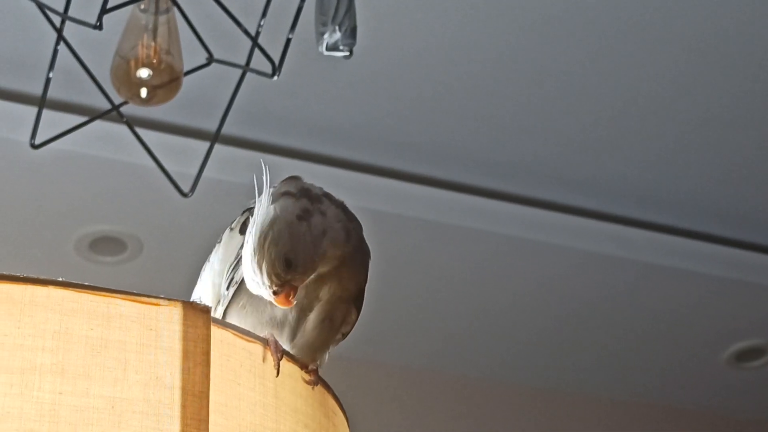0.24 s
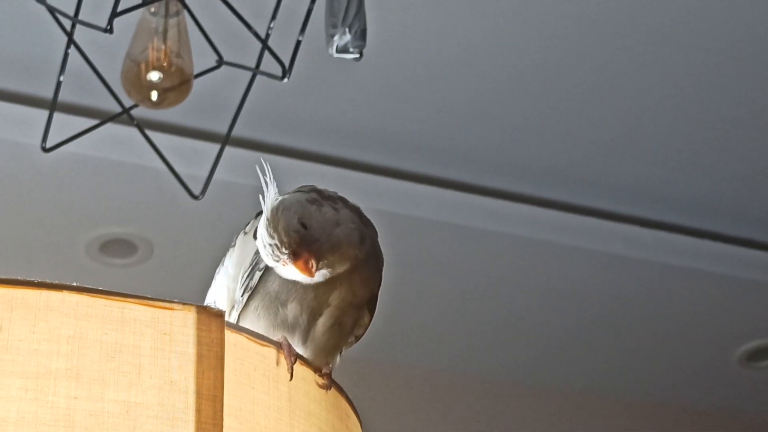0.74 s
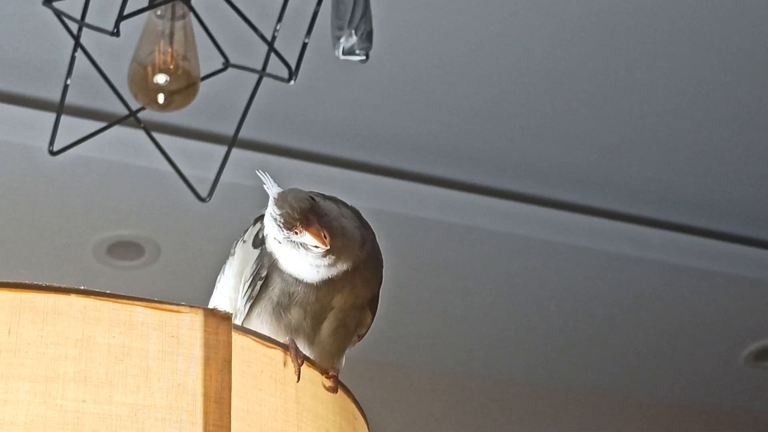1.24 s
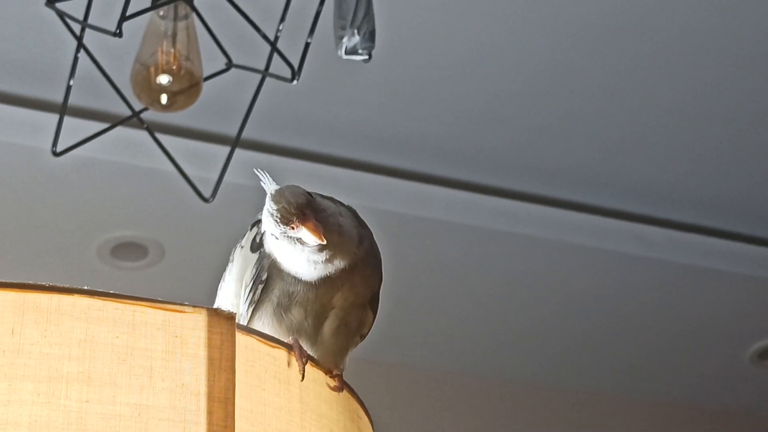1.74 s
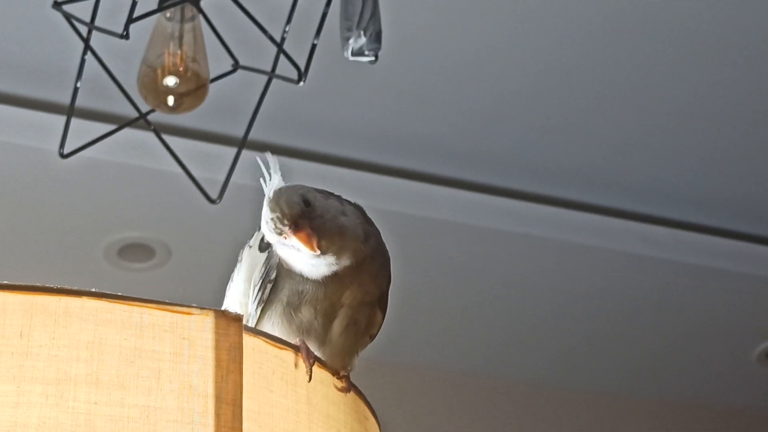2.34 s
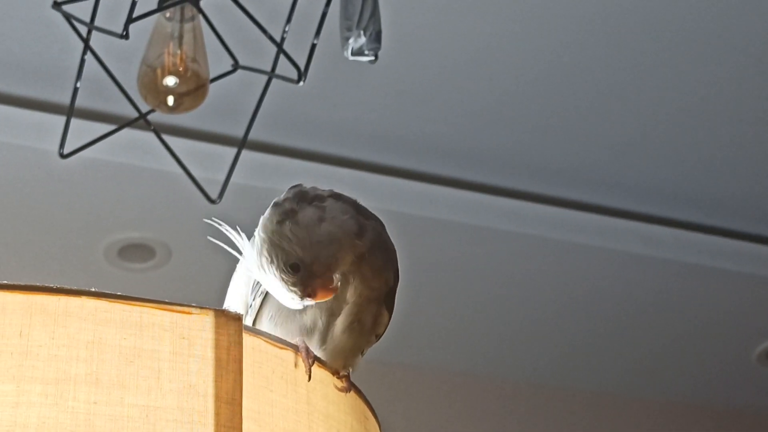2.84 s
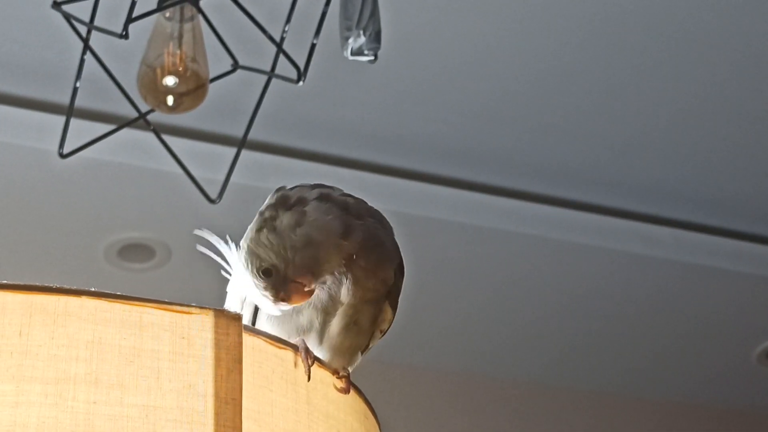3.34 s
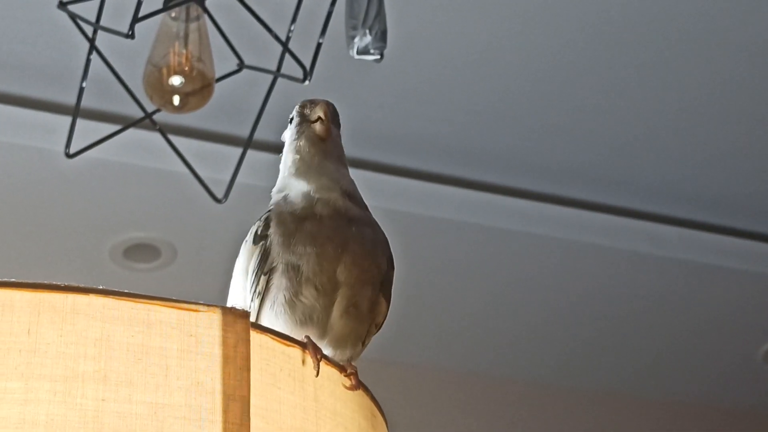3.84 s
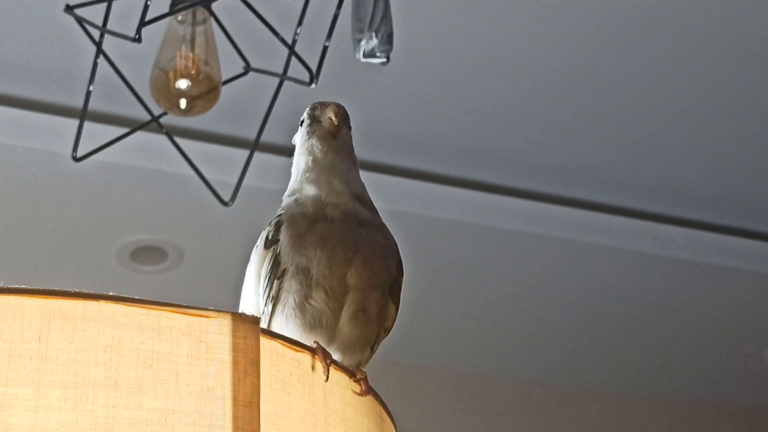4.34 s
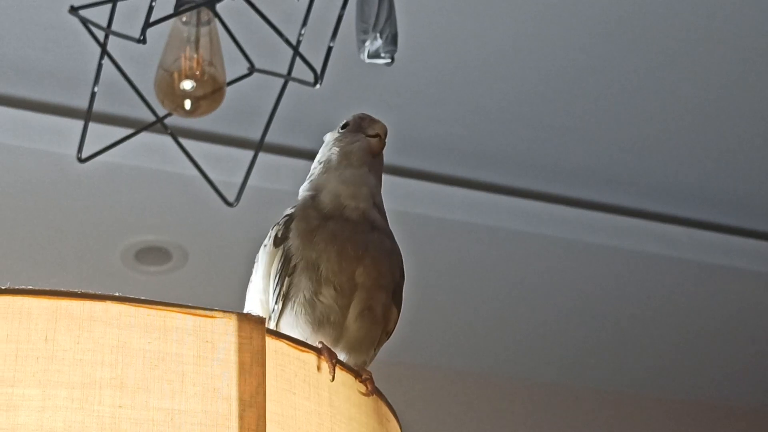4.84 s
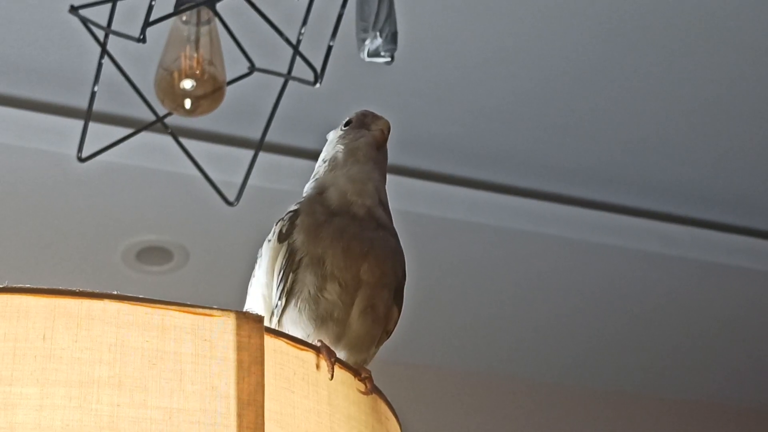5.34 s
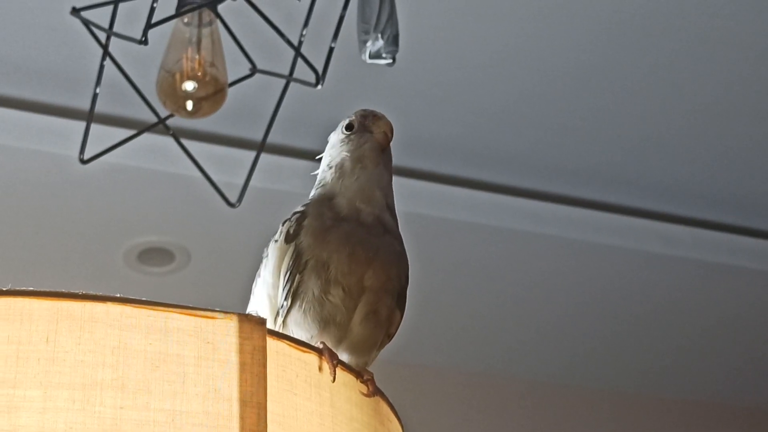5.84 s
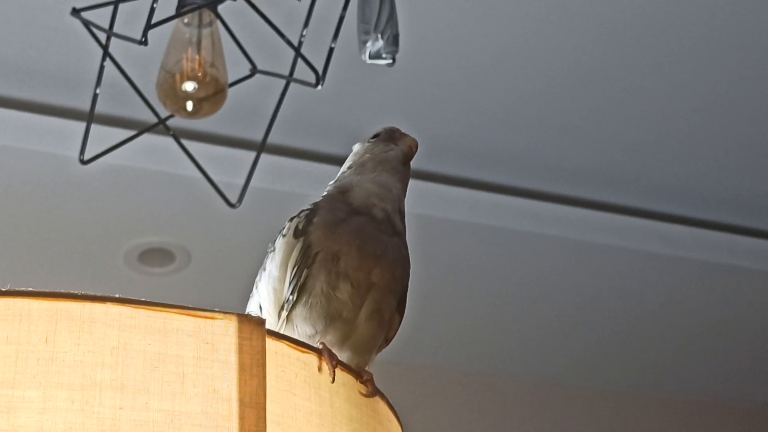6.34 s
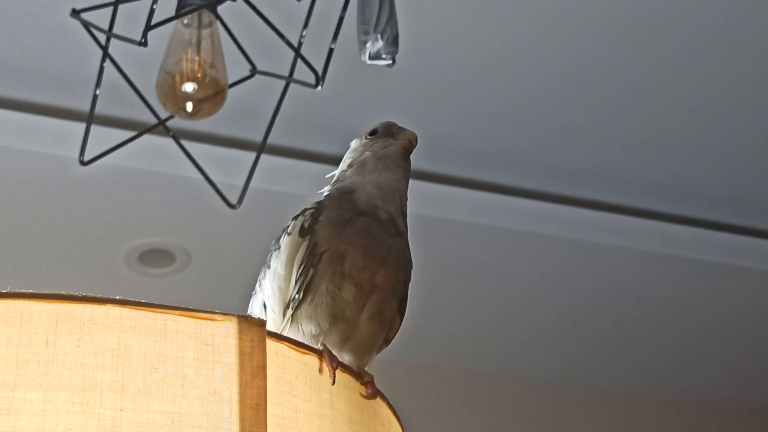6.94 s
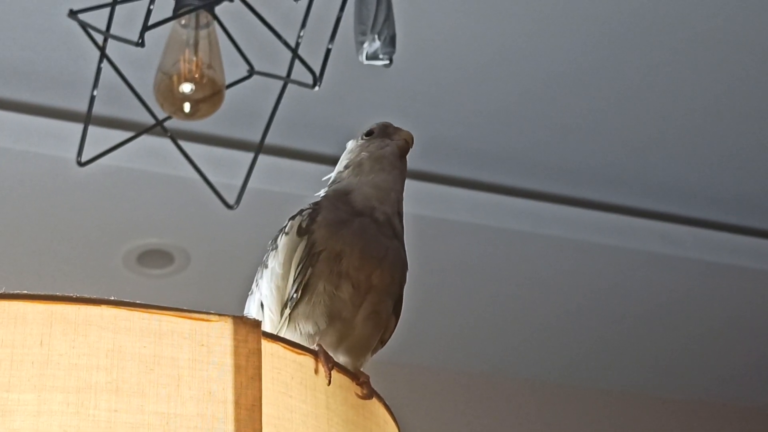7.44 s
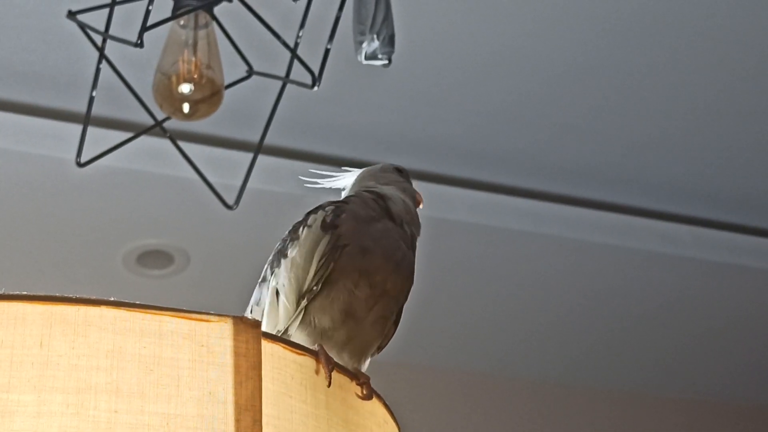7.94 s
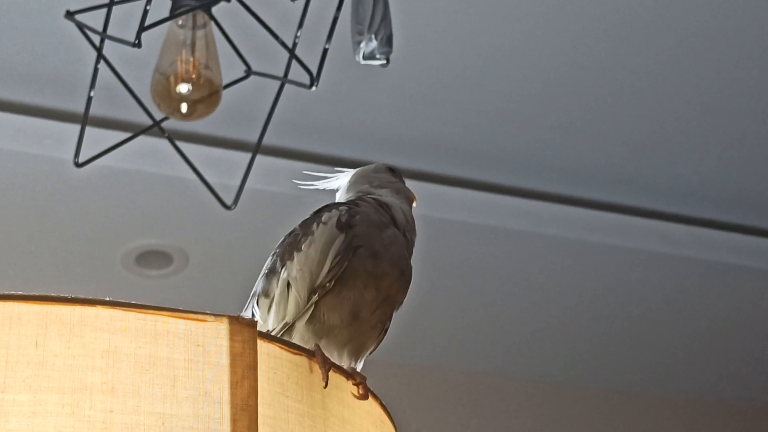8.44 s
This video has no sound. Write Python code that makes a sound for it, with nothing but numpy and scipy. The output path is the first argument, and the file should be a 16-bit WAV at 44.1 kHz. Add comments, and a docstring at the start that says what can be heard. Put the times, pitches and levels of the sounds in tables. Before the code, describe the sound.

Quick, squeaky chirps and whistles from a pet cockatiel alternate high and low in a quiet living room.

```python
"""Quick whistled notes from a pet cockatiel, a few steps from a phone microphone in a living room.
Its syrinx sings a nearly pure tone; most notes drop fast in pitch as the throat closes, and the
room smears each into a short tail. Low throat rasps, beak clicks and two feather rustles fall
among them. Underneath lie mains hum and the quiet wash of the house, its rumble slowly swelling."""
import sys
import numpy as np
from scipy import signal
from scipy.fft import rfft, irfft, next_fast_len
from scipy.io import wavfile
from scipy.ndimage import uniform_filter1d

SR = 44100
rng = np.random.default_rng(int(sys.argv[2]) if len(sys.argv) > 2 else 0)


def generate_wav(sig):
    """Save sig (samples, or channels by samples) to the path in sys.argv[1] as 16-bit PCM at SR."""
    pcm = np.round(np.clip(np.atleast_2d(sig).T, -1, 1) * 32767).astype(np.int16)
    wavfile.write(sys.argv[1], SR, pcm)


N = 383669
LEAD = SR // 5  # samples sung before the start


def gain_of(db):
    """Decibels to a factor."""
    return 10 ** (np.asarray(db) / 20)


def unit_rms(x):
    """Scales to rms 1."""
    return x / np.sqrt(np.mean(x ** 2) + 1e-20)


def value_at(points, hz):
    """Reads a curve on a log-frequency axis."""
    f, value = np.transpose(points)
    return np.interp(np.log(hz + 1), np.log(f + 1), value)


def coloured(x, points):
    """Filters x by a curve of (Hz, dB) points."""
    size = next_fast_len(len(x))
    return irfft(rfft(x, size) * gain_of(value_at(points, np.fft.rfftfreq(size, 1 / SR))), size)[:len(x)]


def drift(count, size):
    """A random wander of rms 1, smoothed over size samples."""
    return unit_rms(uniform_filter1d(uniform_filter1d(rng.standard_normal(count), size), size))


def add(mix, s, sound):
    """Mixes a sound in at s seconds."""
    part = mix[LEAD + round(s * SR):][:len(sound)]
    part += sound[:len(part)]


def syrinx(rows, sparkle_db, halves_db):
    """Vibrating membranes sing a nearly pure tone with overtones and a little air: (start s, sound)."""
    # Above the octave. Each row: multiple of the pitch, level in dB.
    overtones = [(3, 13), (4, 6), (5, 3.5), (6, -2), (7, -2), (8, -2.5), (9, -7), (10, -5.5), (11, -4)]
    # The windpipe colours the overtones. Each row: frequency in Hz, gain in dB.
    windpipe = [(4500, 0), (5200, -15), (5900, -13), (6500, -1), (7700, 4), (9000, 0)]
    # Every other cycle differs in low notes. Each row: multiple of the pitch, relative level in dB.
    half_lines = [(.5, -33), (1.5, -30.5), (2.5, -42), (3.5, -45)]
    s, *columns = np.transpose(rows)
    t = np.arange(s[0], s[-1], 1 / SR)
    hz, fundamental_db, octave_db, upper_db = (
        uniform_filter1d(np.interp(t, s, c), size=90, mode="nearest") for c in columns)
    glide = abs(np.gradient(np.log(hz))) * SR  # per second
    sparkle_db = sparkle_db - np.minimum(.6 * glide, 24)  # slack membranes lose their top in a fast drop
    slack = np.clip(glide / 25, 0, 1)  # a sliding pitch makes the cycles uneven
    sharp = .25 * np.exp(-(t - t[0]) / .0007)  # the membranes start sharp and settle
    sung_hz = hz * (1 + sharp + .0013 * drift(len(t), size=60))
    phase = 2 * np.pi * (np.cumsum(sung_hz) / SR + rng.random())
    husk = 1 + (.02 + .15 * slack) * drift(len(t), size=25)  # uneven cycles spread a haze round the tone
    tone = gain_of(fundamental_db + 1.2 * drift(len(t), size=200)) * husk * np.sin(phase)
    tone += gain_of(octave_db) * np.cos(2 * phase)

    def partial(k, db):
        return gain_of(db) * (k * hz < SR / 2.2) * np.sin(k * phase + k * k)

    for k, db in overtones:
        top = np.clip((k * hz - 9000) / 2000, 0, 1)
        flicker_db = 4.5 * drift(len(t), size=250)
        tone += partial(k, upper_db + db + flicker_db + value_at(windpipe, k * hz) + top * sparkle_db)
    low_voice = np.clip((1800 - hz) / 200, 0, 1) * gain_of(halves_db + 3 * drift(len(t), size=300))
    for k, db in half_lines:
        tone += low_voice * gain_of(fundamental_db + db) * np.sin(k * phase)
    for k in np.arange(7.5, 11):  # half lines among the top overtones
        tone += low_voice * partial(k, upper_db + sparkle_db - 4.5)
    air = gain_of(upper_db - 17) * rng.standard_normal(len(t))
    edges = np.clip(np.minimum((t - t[0]) / .0031, (t[-1] - t) / .002), 0, 1)
    return s[0], np.sqrt(2) * gain_of(-1) * edges * (tone + air)


def short_note(shape, start, settle, swell, turn, onset_hz, settle_hz, swell_hz, turn_hz,
               settle_db, swell_db, octave_db, upper_db, sparkle_db, fade_db=0, halves_db=-8):
    """A note passes onset, settle, swell and turn, then drops as the throat closes."""
    stages, drop = shape
    turn_db = swell_db + fade_db
    path = [(0, onset_hz, settle_db), (settle, settle_hz, settle_db),
            (swell, swell_hz, swell_db), (turn, turn_hz, turn_db)]
    rows = [(start + s, hz, *np.add((db, octave_db, upper_db), offsets))
            for (s, hz, db), offsets in zip(path, stages)]
    rows += [(start + turn + later, share * turn_hz, *np.add((turn_db, octave_db, upper_db), offsets))
             for later, share, *offsets in drop]
    return syrinx(rows, sparkle_db, halves_db)


def song():
    """Five kinds of short note, and two longer whistles that leap up and do not drop."""
    # Each row: start in seconds; settle, swell and turn in seconds after it; four stage pitches in Hz;
    # then in dB the fundamental at settle and swell, octave, higher overtones, sparkle (full above
    # 11 kHz) and, where given, fade from swell to turn and half lines.
    high = [(-.16, .02, .05, 0.057, 2383, 2080, 2149, 2262, -28, -26, -21, -55, 2.5, -7.5),
            (.404, 0.022, 0.0566, 0.0678, 2528, 2015, 2210, 2218, -33, -25, -22, -50.5, 0, -2.5),
            (.806, 0.019, .051, 0.0591, 2497, 2080, 2135, 2354, -34, -29, -21, -51, 5.5, 2.5),
            (1.212, 0.021, 0.0533, 0.06116, 2345, 2027, 2188, 2274, -37.5, -26, -19.5, -51, 2.5, -1),
            (3.381, .022, 0.0612, 0.0679, 2400, 2071, 2266, 2259, -32, -24, -18.5, -45.5, -5.5, -1.5),
            (3.796, .018, 0.0547, 0.073, 2522, 2041, 2296, 2402, -31.5, -24, -20.5, -50.5, 4, -5),
            (4.202, .045, .06, 0.0783, 2335, 2185, 2131, 2300, -30, -25.5, -19, -50, 7.5, -2.5),
            (5.242, .03, 0.064, 0.06784, 2150, 2095, 2171, 2248, -35, -22, -21.5, -54, -4, -6.5),
            (5.664, 0.02, 0.063, .069, 2367, 2056, 2182, 2340, -32.5, -24, -22, -55, -4, -6.5),
            (7.15, .022, 0.044, 0.06465, 2396, 2118, 2182, 2278, -28.5, -22, -17.5, -48.5, 0, -7.5),
            (7.566, 0.036, 0.0568, 0.0759, 2265, 2075, 2213, 2274, -29, -23.5, -18, -49, -3.5, -2.5),
            (8.014, 0.02, 0.0602, 0.0679, 2306, 2102, 2229, 2202, -31, -26, -19.5, -49, 3, -1.5)]
    low = [(.217, 0.0179, 0.0552, 0.0832, 1380, 1395, 1624, 1569, -37.5, -31.5, -64, -80.5, 10.5, -8, -4.5),
           (0.619, .028, 0.0441, 0.0696, 1334, 1404, 1515, 1531, -38, -34, -65, -80.5, 10.5, 1, 1),
           (1.03, 0.0275, 0.0544, 0.068, 1406, 1431, 1576, 1564, -36.5, -34.5, -62, -77, 11.5, -3.5, -2.5),
           (3.18, 0.0053, 0.01975, 0.0726, 1337, 1370, 1380, 1525, -40, -36, -59.5, -81, 10, -6, -6),
           (3.595, 0.0094, .06, 0.0966, 1392, 1337, 1651, 1651, -39, -32.5, -64.5, -76.5, 15, -0.5, -12),
           (4.012, 0.0129, 0.0563, 0.0764, 1535, 1346, 1645, 1600, -44, -31.5, -64, -78, 4, -1.56, -6.5),
           (5.03, 0.0253, 0.0461, .101, 1374, 1386, 1478, 1551, -43, -32, -64, -75.5, -0.2, -5.5, -5.5),
           (5.48, .013, 0.032, .074, 1430, 1429, 1480, 1653, -40.5, -33.5, -61, -76, 2.4, -3.5, -8),
           (6.957, 0.0297, 0.051, 0.0843, 1369, 1447, 1539, 1573, -41.5, -31, -58, -74.5, 6, -3, -6),
           (7.347, .022, 0.0985, 0.113, 1646, 1465, 1663, 1569, -38.5, -35.5, -67, -75.5, -4.5, -3, 2),
           (7.811, 0.0187, 0.0713, 0.0827, 1565, 1451, 1576, 1531, -39.5, -33.5, -63, -77.5, -2, -8, -0.12)]
    middle = [(2.336, 0.024, 0.0591, .072, 2224, 1965, 1998, 1881, -42, -33.5, -64, -64.5, 12.8),
              (2.821, 0.0178, 0.063, 0.0746, 2115, 2001, 2086, 2135, -39.5, -36, -61.5, -64.5, 7.3),
              (6.524, 0.017, .072, 0.0974, 1583, 1830, 1940, 1905, -44, -32, -50.5, -67.5, 9)]
    chips = [(.023, .011, .015, 0.0193, 2944, 2264, 1958, 1924, -38, -28.5, -22, -53.5, -10),
             (3.024, .004, .007, 0.0092, 2529, 2158, 1998, 1931, -39, -28, -22, -52.5, -3.5),
             (4.855, .009, 0.019, 0.02513, 2796, 2831, 2095, 1842, -28.5, -32, -25.5, -61.5, -7),
             (6.745, .001, .002, 0.0066, 1899, 1953, 1905, 1803, -34.5, -33.5, -24.5, -62.5, -3.5),
             (8.67, .013, .018, 0.0259, 2650, 2640, 2060, 1787, -32.5, -36.5, -41.5, -67, 7.5)]
    falls = [(1.422, 0.0294, 0.0512, 0.0547, 2539, 2217, 1841, 1390, -39, -40.5, -62.5, -69, 11, 7.5, -5.5),
             (4.446, 0.0249, 0.0403, 0.0578, 2640, 2135, 1834, 1794, -39.5, -40.5, -62, -74.5, 5, 5, 7),
             (5.882, .034, .055, .065, 2547, 2238, 1863, 1370, -33.5, -35.5, -57, -71, 6, 0, 7.5),
             (8.22, 0.031, 0.0543, 0.0634, 2740, 2196, 1957, 1379, -36, -34.5, -62.5, -69, -2, 0.5, -2.5)]
    # What each kind shares. Each of four stage rows: offsets in dB for fundamental, octave, overtones.
    # Each drop row: seconds after the turn, share of the turn pitch, the same three offsets.
    high_shape = ([(-4, -51.5, -32.5), (-0.5, -22, -16), (-2, -7, -9), (-1, -13.5, -7.5)],
                  [(.006, 0.962, -1.5, -8, -6.5), (.01, .89, -5.5, -2.5, -3.5),
                  (.0135, 0.7972, -6.5, -0.5, 3.5), (.016, 0.6787, -13, -12.5, -6.5),
                  (.019, 0.56, -27.5, -34, -19.5)])
    low_shape = ([(-1, 1, -5), (0.83, -5, -2.5), (0.68, 1, 2), (0, -0.5, -1)], [(.003, .92, -1.5, 1, -4),
                 (.006, .74, -16, -10.5, -10)])
    middle_shape = ([(-12.5, -19.5, -26), (-0.5, -7.5, -14.5), (2.5, 3.5, -1.5), (-2.5, -4.5, -8.5)],
                    [(.003, .91, -14, -20, -10), (.006, .57, -21.5, -20, -23.5), (.011, .51, -30, -5, -28)])
    chip_shape = ([(2.5, -41.5, -23), (-0.5, -27, -19.5), (-2, -13, -14.5), (-11.5, -0.5, -3)],
                  [(.004, .85, -8.5, -9, 2), (.009, .66, -25.5, -31, -21)])
    fall_shape = ([(-7, -19.5, -21), (0, 4, 1), (-1, -3.5, -1), (-6.5, -9.5, -7)],
                  [(.009, .9, -13, -7.5, -13.5)])
    # One list a whistle. Each row: time in seconds, pitch in Hz, fundamental, octave, overtones in dB.
    leaps = [
        [(4.621, 2377, -31, -73.5, -80.5), (4.658, 2121, -29.5, -44.5, -72), (4.7, 2189, -26, -31.5, -60.5),
         (4.725, 2362, -25, -41, -59.5), (4.743, 2652, -21.5, -62.5, -76), (4.757, 2653, -42.5, -57, -73),
         (4.775, 2545, -35.5, -61, -80)],
        [(8.425, 2602, -42.5, -73, -103.5), (8.446, 2293, -33.5, -54, -72), (8.467, 2179, -23, -47, -68.5),
         (8.515, 2297, -31.5, -42, -62), (8.519, 2698, -23, -58, -74.5), (8.545, 2856, -32, -67, -74),
         (8.566, 2912, -48.5, -68, -75.5)],
    ]
    mix = np.zeros(LEAD + N)
    for shape, notes in ((high_shape, high), (low_shape, low), (middle_shape, middle),
                         (chip_shape, chips), (fall_shape, falls)):
        for row in notes:
            add(mix, *short_note(shape, *row))
    for rows in leaps:
        add(mix, *syrinx(rows, sparkle_db=6, halves_db=-8))
    return mix


def living_room(x):
    """A few steps away: direct sound, wall echoes, then a dense tail whose top treble dies first."""
    # Each row: frequency in Hz, seconds for the tail to fall 60 dB.
    decay = [(700, 0.32), (1500, 0.324), (2500, 0.305), (4500, 0.2726), (8000, 0.33), (14000, .22)]
    # First echoes. Each row: delay in seconds, level in dB against the direct sound.
    walls = [(.008, -11.5), (.012, -13.5), (.017, -24.5), (.024, -16.5)]
    hz, t, spectrum = signal.stft(rng.standard_normal(SR), SR, nperseg=256)
    spectrum *= gain_of(-60 * t / value_at(decay, hz)[:, None])
    tail = signal.istft(spectrum, SR, nperseg=256)[1][:SR]
    tail *= np.clip(np.arange(SR) / SR / .041, 0, 1)  # builds up over the first echoes
    response = gain_of(-9) * tail / np.linalg.norm(tail)
    response[0] = 1
    for s, db in walls:
        response[round(s * SR)] += gain_of(db) * rng.choice([-1, 1])
    return signal.fftconvolve(x, response)[:len(x)]


def house():
    """Room tone: mains hum wavers a little over a wash of air and appliances."""
    # Each row: frequency in Hz, rms level in dB.
    mains = [(100, -75.5), (200, -70), (300, -82.5), (400, -94)]
    # Each row: frequency in Hz, relative noise density in dB.
    wash_spectrum = [(30, -31), (48, -24.5), (65, -3), (100, 0), (180, 0), (400, -8.5), (900, -13.5),
                     (2000, -23.5), (5000, -25), (8000, -21), (13000, -31), (16000, -29.5)]
    # The low rumble swells. Each row: time in seconds, gain in dB.
    rumble_swell = [(0, -1.5), (4.2, -0.5), (4.8, 0.5), (6.5, 1.5), (8, 4.5), (8.7, 5.5)]
    t = np.arange(N) / SR
    hum = np.zeros(N)
    for hz, db in mains:
        amplitude = np.sqrt(2) * gain_of(db + .54 * drift(N, size=3000))
        hum += amplitude * np.sin(2 * np.pi * (hz * t + rng.random()))
    wash = unit_rms(coloured(rng.standard_normal(N), wash_spectrum))
    rumble = coloured(wash, [(150, -4.5), (400, -35.5)])
    wash += rumble * (gain_of(np.interp(t, *np.transpose(rumble_swell))) - 1)
    return hum + gain_of(-66.5 + .5 * drift(N, size=9000)) * wash


def throat_rasps():
    """A few low, uneven cycles as the throat closes or opens."""
    # Each row: start in seconds, level in dB, centre pitch in Hz, length in seconds.
    rasps = [(1.461, -48.5, 774, 0.0395), (2.367, -61.5, 1008, 0.01), (2.411, -56.5, 1036, 0.013),
             (2.897, -48, 1090, 0.0055), (3.46, -43, 949.6, 0.014), (4.007, -53.5, 802.7, 0.041),
             (4.481, -51.5, 829.5, 0.0418), (4.756, -51, 1243, 0.00875), (8.536, -48, 1393, 0.0095),
             (5.036, -51, 882, 0.017), (5.939, -49.5, 749.7, 0.0136), (6.53, -56, 863, 0.0447),
             (7.349, -52, 946.5, 0.0145), (7.816, -59, 744, 0.04), (8.271, -49.5, 742, 0.0169)]
    mix = np.zeros(LEAD + N)
    for s, db, hz, length in rasps:
        count = round(length * SR)
        rough_hz = hz * (1 + .12 * drift(count, size=60))
        phase = 2 * np.pi * (np.cumsum(rough_hz) / SR + rng.random())
        add(mix, s, gain_of(db + 3 * drift(count, size=80)) * np.sin(phase) * np.hanning(count))
    return mix


def beak_clicks():
    """Small clicks of the beak, each a ring that dies at once."""
    # Each row: start in seconds, level in dB.
    clicks = [(1.553, -46), (2.3765, -49), (2.8509, -63), (4.551, -47.5), (5.2564, -44)]
    t = np.arange(100) / SR
    ring = np.sin(2 * np.pi * 3200 * t) * np.exp(-t / .00015)
    mix = np.zeros(LEAD + N)
    for s, db in clicks:
        add(mix, s, gain_of(db) * ring)
    return mix


def feather_rustles():
    """Grainy hiss of feathers sliding over each other."""
    # One list a rustle. Each row: time in seconds, level in dB.
    rustles = [
        [(2.522, -77), (2.534, -63), (2.545, -63.5), (2.555, -62.5), (2.6, -73.5), (2.63, -74)],
        [(7.52, -74), (7.53, -61.5), (7.56, -64)],
    ]
    mix = np.zeros(LEAD + N)
    for rows in rustles:
        s, db = np.transpose(rows)
        t = np.arange(s[0], s[-1], 1 / SR)
        grains = rng.standard_normal(len(t)) * gain_of(2.5 * drift(len(t), size=120))
        hiss = coloured(grains, [(500, -8.5), (1000, -2), (3000, -11), (8000, -10.5), (12000, -23)])
        envelope = gain_of(np.interp(t, s, db)) * signal.windows.tukey(len(t), .2)
        add(mix, s[0], unit_rms(hiss) * envelope)
    return mix


def scene():
    """The bird in its room over the sound of the house, in mono."""
    bird = song() + throat_rasps() + beak_clicks() + feather_rustles()
    return (living_room(bird)[LEAD:] + house())[None]


def record(dry):
    """The phone's microphone port dips the treble, its preamplifier hisses faintly; then a low-pass."""
    # Each row: frequency in Hz, gain in dB.
    port_response = [(4650, 1.5), (4900, -1.5), (6000, -1.5), (6250, -1), (7000, -4), (8400, -4.5),
                     (8800, -29.5), (10000, -29), (11400, -22), (11750, -1.5), (13000, 5.5), (15000, 2.5)]
    heard = coloured(dry[0], port_response)[None] + gain_of(-85.5) * rng.standard_normal((1, N))
    band_limit = signal.firwin(1023, cutoff=15800, window=("kaiser", 9), fs=SR)
    return signal.oaconvolve(heard, band_limit[None], "same")


dry = scene()
out = record(dry)
generate_wav(out)
```